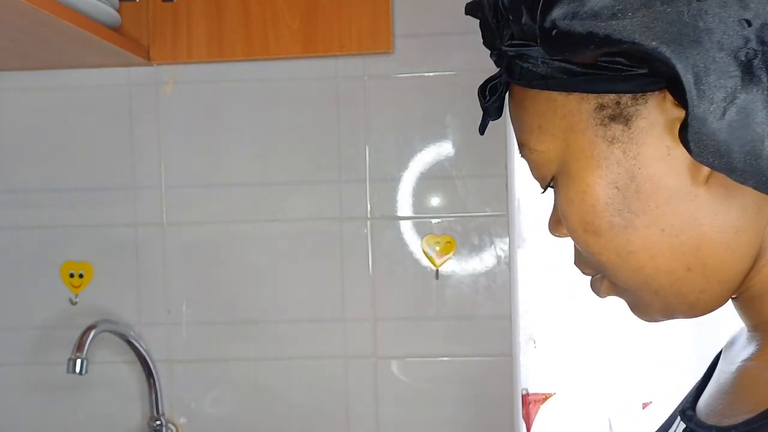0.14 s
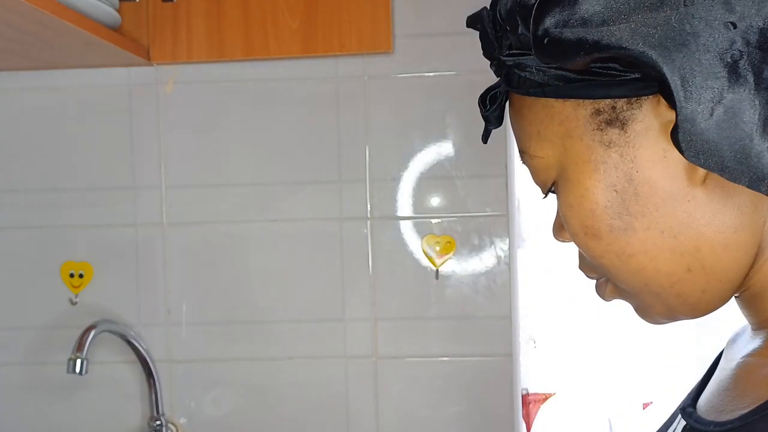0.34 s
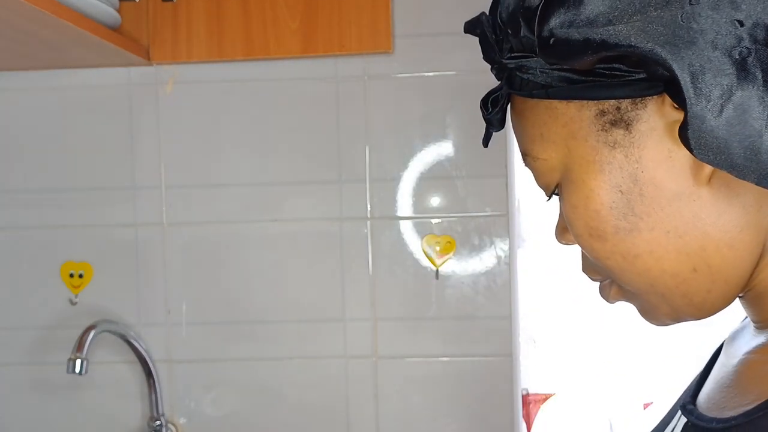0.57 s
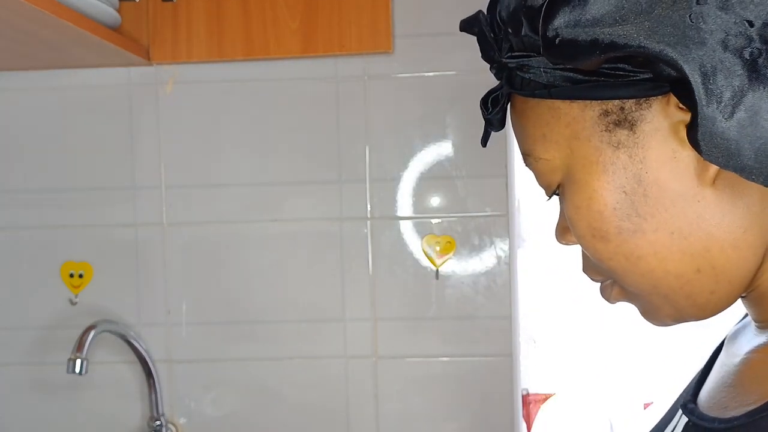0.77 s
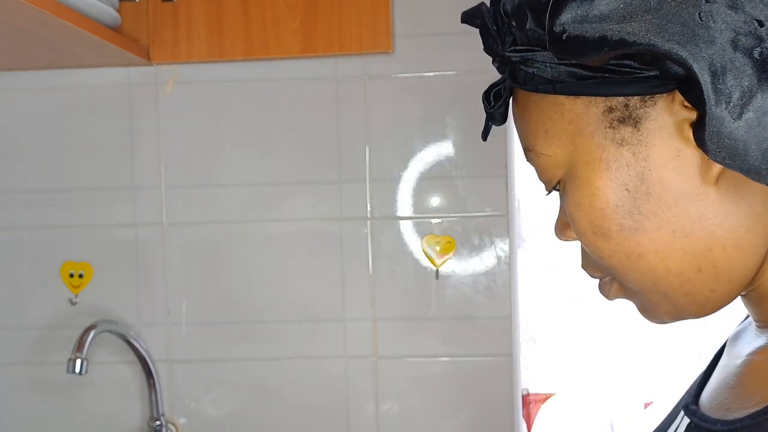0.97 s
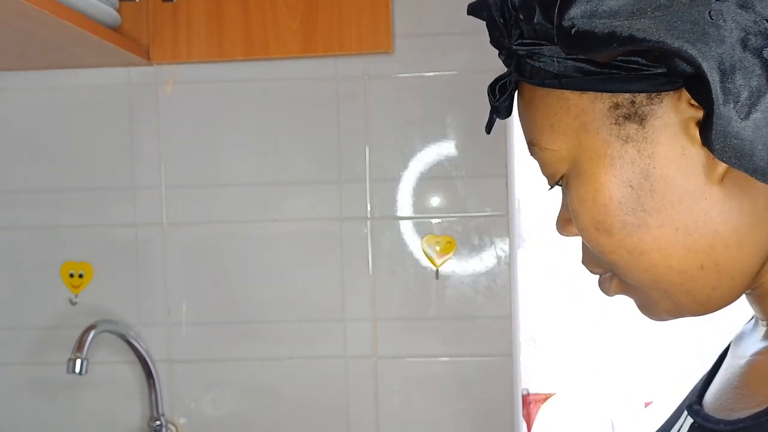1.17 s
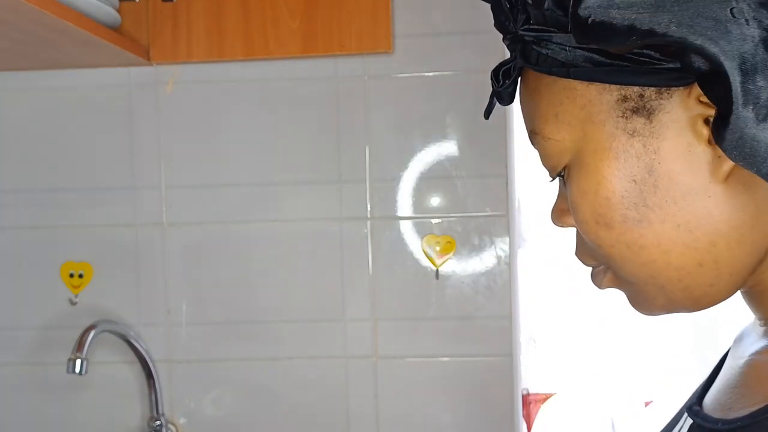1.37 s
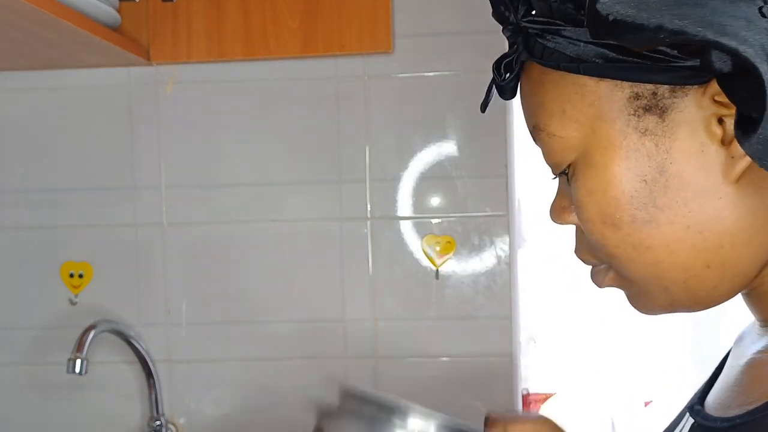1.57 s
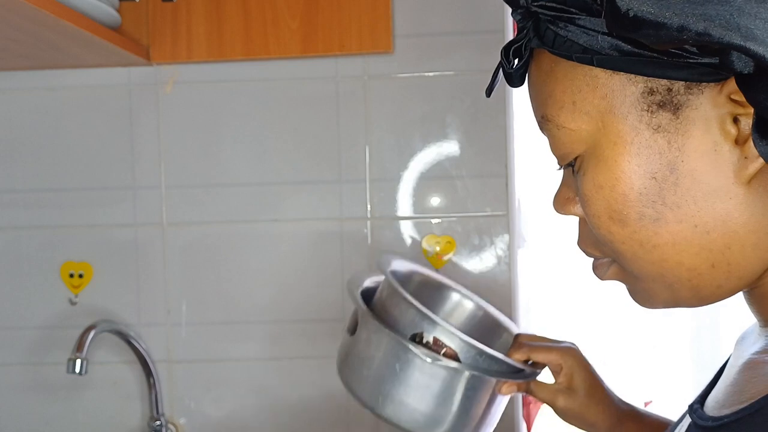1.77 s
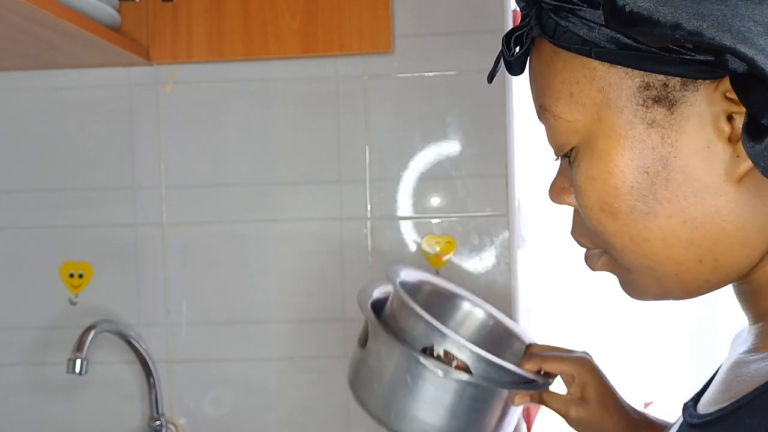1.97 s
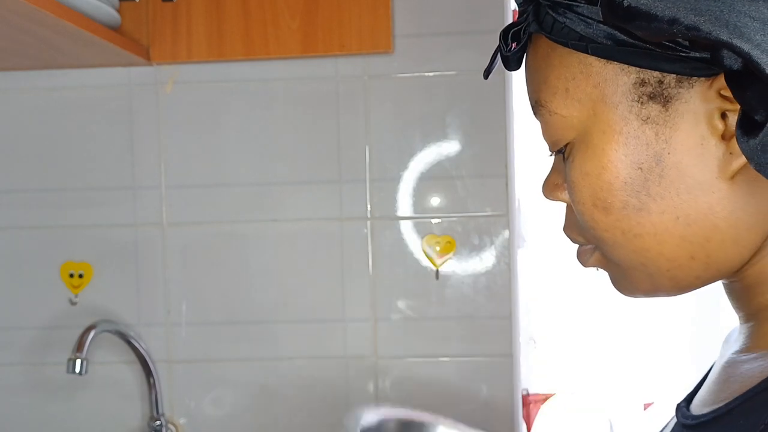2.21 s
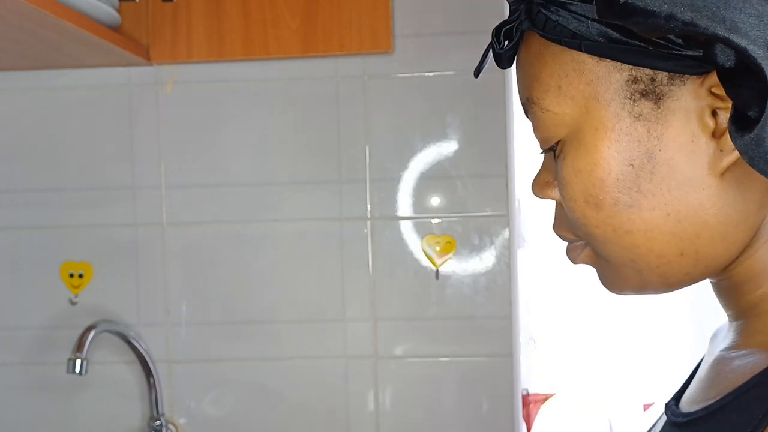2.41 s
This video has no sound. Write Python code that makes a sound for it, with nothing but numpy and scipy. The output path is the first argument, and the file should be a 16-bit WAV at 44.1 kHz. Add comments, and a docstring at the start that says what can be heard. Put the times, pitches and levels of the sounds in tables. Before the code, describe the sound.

Steel pots clatter as they are set down and nested on a sink top. A quick run of clanks gives way to lighter knocks, then two more clanks, the last ringing briefly, close by in a small tiled kitchen.

```python
"""Pots stacked on a steel sink

Steel pots and a pan are set down and nested on a sink top in a small tiled kitchen. Each impact drives the low
modes of the hollow bowl, the cabinet below and the room, then chatters on in small contacts. A pot, a pan, a
lid and a faint dish ring at their own natural frequencies, while the dense upper modes of the steel merge into
broad crashes. The room adds a short reverberation and a low, steady noise."""
import sys
import numpy as np
from scipy import signal
from scipy.fft import rfft, irfft
from scipy.io import wavfile
from scipy.ndimage import uniform_filter1d

SR = 44100
rng = np.random.default_rng(int(sys.argv[2]) if len(sys.argv) > 2 else 0)


def bounce(signal):
    """Save signal as a 16-bit WAV file at the path given by the first command-line argument."""
    frames = np.transpose(np.atleast_2d(signal))
    limited = np.clip(frames, -1, 1)
    pcm = np.round(limited * 32767).astype(np.int16)
    wavfile.write(sys.argv[1], SR, pcm)


N = 108045

# Knocks on the sink. Each row: start in seconds, relative bowl level in dB, centre in Hz,
# bowl T60 in seconds, chatter time constant in seconds, cabinet level in dB.
SINK_KNOCKS = [(0.204, 0.5, 433, 0.073, 0.0036, -44), (0.224, -5.5, 382, 0.17, 0.0053, -47),
               (0.249, -14, 388, 0.078, 0.012, -38), (0.285, -5.5, 363, 0.11, 0.014, -42),
               (0.337, -19, 342, 0.23, 0.0087, -40), (0.415, 6, 374, 0.14, 0.014, -36),
               (0.437, 0.5, 428, 0.062, 0.005, -37.5), (0.459, -2, 500, 0.09, 0.008, -41),
               (0.477, -6, 406, 0.076, 0.008, -42.5), (0.534, -21, 390, 0.21, 0.008, -57),
               (0.585, -7, 404, 0.24, 0.0027, -50), (0.62, 7.5, 495, 0.076, 0.018, -47),
               (0.636, -14.5, 412, 0.11, 0.018, -38), (0.677, -28, 415, 0.089, 0.0063, -50.5),
               (0.719, -21.5, 515, 0.076, 0.004, -57), (0.878, -43, 369, 0.28, 0.008, -65),
               (0.939, -34, 503, 0.26, 0.008, -58.5), (0.988, -28, 371, 0.4, 0.0093, -49),
               (1.08, -4.5, 474, 0.28, 0.0045, -41), (1.103, -23.5, 463, 0.26, 0.0045, -42),
               (1.138, -30, 455, 0.11, 0.0064, -48), (1.199, -31, 466, 0.12, 0.011, -58.5),
               (1.251, -29, 374, 0.15, 0.0071, -59.5), (1.296, -38, 371, 0.22, 0.0091, -56),
               (1.448, -34.5, 371, 0.17, 0.008, -56), (1.62, -48, 511, 0.42, 0.008, -68.5),
               (1.713, -7, 506, 0.13, 0.013, -30), (1.747, -14.5, 406, 0.22, 0.01, -35),
               (2, -40, 398, 0.14, 0.01, -58), (2.043, -5.5, 366, 0.093, 0.01, -40),
               (2.088, -12, 345, 0.3, 0.011, -50), (2.119, -9, 530, 0.052, 0.0094, -39.5),
               (2.338, -13.5, 304, 0.097, 0.019, -35), (2.367, -8.5, 283, 0.088, 0.0062, -47),
               (2.405, -9.5, 291, 0.087, 0.0053, -40)]
# Modes of the bowl. Each row: frequency in Hz, relative level in dB.
BOWL_MODES = [(250, -6.5), (282, -6.5), (320, -1.5), (345, -2.5), (375, 3), (405, 3), (430, -3), (460, 3.5),
              (503, -1), (532, -5), (580, -11.5)]
# Modes of the cabinet, with a long room mode near 128 Hz. Each row: frequency in Hz, relative level in dB, T60
# in seconds.
CABINET_MODES = [(40.2, -16.5, 0.34), (63.5, -11, 0.25), (127.74, 1.5, 0.43), (157.8, 0, .3),
                 (204, -6.5, .3), (248.3, -2.5, .45)]

# Natural frequencies of each vessel in Hz.
POT_HZ = [514, 1066, 1276, 1502, 1834, 1918, 2149, 2424, 2458, 2859, 3270, 3490, 3569, 4072, 4460, 4855,
          5650, 6580, 6840, 7720, 9190, 9910, 11200]
PAN_HZ = [958, 1265, 1556, 2130, 2277, 2530, 2702, 2813, 3133, 3553, 4151, 4856, 5873]
LID_HZ = [877, 1200, 1310, 1620, 1954, 2300, 2457, 3295, 3558, 4064, 4382, 4665, 5140, 5620]
DISH_HZ = [467, 540, 1351, 1451, 1666, 1866, 2320, 3500]
# The modes at those frequencies. Each row: relative level in dB, free T60 in seconds.
POT_MODES = [(-12.5, 1), (-14, 0.23), (-0.5, 0.71), (-20.5, 0.42), (0.5, 0.3), (0.5, 0.35), (-7.5, 0.6),
             (-9, 1), (-4.5, 1), (-6.5, 0.34), (-21.5, 1), (-14, 0.47), (-21, 0.54), (-15, 0.49),
             (-24.5, 0.9), (-30, 0.47), (-23.5, 0.44), (-23.5, 0.15), (-37, 0.18), (-22.5, 0.11),
             (-27, 0.13), (-20, 0.13), (-38, 0.22)]
PAN_MODES = [(-11.5, 0.33), (1.5, .12), (-13.5, 0.77), (-5.5, 0.15), (-1.5, 0.29), (-7.5, .2), (-1, 0.21),
             (-8.5, 0.63), (-8.5, .1), (-21, .25), (-22, .3), (-21, 0.36), (-25.5, 0.36)]
LID_MODES = [(-1, 0.28), (5, .2), (-0.5, 0.16), (-1, 0.13), (0, 0.21), (1, 0.43), (-0.5, 0.21), (-20, 0.2),
             (-11, .21), (-11, 0.21), (-15, .3), (-6, 0.36), (-10, 0.28), (-10, 0.23)]
DISH_MODES = [(-53.5, .15), (-55, .15), (-52, .4), (-54.5, .2), (-51, .2), (-51, .25), (-57, 0.31),
              (-72, 0.22)]
# Blows on each vessel. Each row: start in seconds, level in dB, chatter time constant in seconds, tilt
# above 1300 Hz in dB per octave, factor on the free T60, delay of the grip in seconds, grip loss in dB.
POT_BLOWS = [(1.292, -44, .003, -48.5, 1.2, 0.041, 1.5), (2.044, -12.5, 0.018, 0.5, 1.22, 0.1, 15),
             (2.2, -27.5, 0.0042, 1.5, 0.52, 0.1, -2)]
PAN_BLOWS = [(0.202, -11.5, 0.013, 1.5, 1.26, 0.066, 6), (0.285, -29.5, .01, -3.5, 1.4, 0.034, 3)]
LID_BLOWS = [(.99, -54, 0.018, -20, .9, 0.055, 1.5), (1.08, -51.5, .01, 6, 1.1, 0.052, 1.2),
             (1.293, -65, 0.012, 3, .7, .04, 3), (1.715, -20.5, 0.0088, -4.5, 0.49, 0.061, 1.9)]
DISH_BLOWS = [(0.00077, 0.019, .01, 0, 0.59, 1, 0)]

# Metal crashes. Each row: start in seconds, level in dB, tilt in dB per octave, attack in seconds,
# hold in seconds, T60 in seconds, lead of the left channel in milliseconds.
CRASHES = [(.001, -51, 0, 0.00033, 0.01, .3, 0.1), (0.199, -15.5, 1.5, 0.0046, 0.045, .3, 0.07),
           (0.286, -21, -1, 0.0033, 0.019, .25, 0.047), (0.413, -17.5, 2.5, .002, 0.03, .3, -0.074),
           (0.434, -13.5, -1, 0.0062, 0.017, .25, -0.11), (0.584, -30, 2.5, 0.0025, 0.06, .3, 0.019),
           (0.617, -16.5, 0, 0.0023, 0.02, 0.13, 0.1), (0.638, -33.5, -1.5, 0.031, 0.05, .3, .05),
           (0.921, -52, -4, 0.012, 0.023, .3, 0.11), (0.983, -38.5, -5, .005, 0.037, .3, 0.13),
           (1.078, -32, 2.5, 0.0025, 0.018, .3, 0.054), (1.288, -46, -2.5, .004, 0.018, .25, 0.16),
           (1.459, -65, -4.5, 0.0049, .02, 0.25, 0.12), (1.62, -70.5, 2, .02, 0.083, .2, 0.042),
           (1.714, -11.5, 6.5, 0.0029, 0.0023, 0.091, 0.025), (1.716, -16, 0, 0.0024, 0.032, 0.37, 0.1),
           (2.042, -22, -0.5, .002, 0.078, 0.24, 0.032), (2.199, -37, -1.5, 0.012, 0.021, 0.73, -0.26),
           (2.318, -43, 0.5, .03, .02, .3, -0.17), (2.371, -30, -3, 0.0034, 0.011, 0.19, -0.22)]
# Base spectrum of a crash. Each row: frequency in Hz, relative spectral density in dB.
CRASH_SPECTRUM = [(35, -61), (60, -38.5), (295, -34), (409, -25), (517, -17), (639, -8), (929, -5.5),
                  (3070, -13.5), (4790, -13.5), (11400, -17.5), (16200, -30.5)]
# Broad resonances of the stacked steel. Each row: centre in Hz, width in Hz, gain in dB.
STEEL_RESONANCES = [(966, 120, 4), (1279, 68, 5), (1507, 32, 5.5), (1910, 92, 4.5), (2202, 60, 5.5),
                    (2465, 150, 6), (3218, 67, -4), (3450, 500, 0.5), (4100, 160, 5.5), (4650, 73, 5.5),
                    (5260, 130, 0), (7370, 240, -1), (7540, 200, 2.5), (9400, 900, -1)]
# Stereo balance of every noise. Each row: frequency in Hz, left minus right in dB.
NOISE_BALANCE = [(60, 4.5), (110, 4), (200, -5.5), (380, 1.5), (700, -4), (1290, -2.5), (2380, -2.5),
                 (4400, -1.5), (8120, -4), (15000, 6)]
# Spectrum of the background. Each row: frequency in Hz, relative spectral density in dB.
BACKGROUND_SPECTRUM = [(25, -4.5), (87, 2.5), (250, -9.5), (960, -23.5), (1400, -13), (4250, -36),
                       (16000, -40)]

TWIN_SPLIT_HZ, TWIN_DB, TWIN_DB_PER_OCT = 8, -10.5, 4  # a mode's twin at 1 kHz; wider and stronger above
FIRST_CONTACT_GAIN, GRIP_FADE_S = 2.5, 0.078
KNOCK_REACH_OCT, KNOCK_FAR_DB, KNOCK_SCATTER_DB = 0.17, -15.5, 2.5
BOWL_RADIATES_HZ = 230
RIPPLE_WIDTH_HZ, RIPPLE_DB = 30, 3  # fine unevenness of the dense upper modes
COHERENT_BELOW_HZ, TREBLE_COHERENCE = 710, 0.64
ROOM_T60_S, ROOM_DB, ROOM_DELAY_S = 0.4, -5, 0.0018


def undb(db):
    """Amplitude is exponential in level: tenfold for every 20 dB."""
    return 10 ** (np.asarray(db) / 20)


def curve(hz, table):
    """Interpolation of a (Hz, value) table on a logarithmic frequency axis."""
    table = np.array(table, float)
    return np.interp(np.log(hz + 1), np.log(table[:, 0]), table[:, 1])


def add(out, sound, at_s):
    """Superposition: a sound sums into the mix from its start time."""
    start = int(at_s * SR)
    n = min(sound.shape[-1], N - start)
    out[:, start:start + n] += sound[..., :n]


def struck_modes(hz, db, t60, chatter_s, rise_s, left_lag_s=0, pan_db=0, grip_s=1, grip_db=0, size=30000):
    """Convolution: damped, beating mode pairs answer a chattering contact force; a hand may grip later."""
    t = np.arange(size) / SR
    force = rng.standard_normal(4096) * np.exp(-t[:4096] / chatter_s)
    force *= rng.random(4096) < .05  # sparse small contacts
    force[0] += FIRST_CONTACT_GAIN * np.linalg.norm(force)
    side = np.array([[1.], [-1.]])
    twins = rng.standard_normal((len(hz), 2))
    response = np.zeros((2, size))
    for f, level_db, decay_s, (spread, phase) in zip(hz, db, t60, twins):
        n = min(int(decay_s * SR * 1.2), size)
        twin_gain = undb(min(TWIN_DB + TWIN_DB_PER_OCT * np.log2(f / 1000), -1))
        beat_hz = TWIN_SPLIT_HZ * f / 1000 * (1 + 0.14 * spread)
        beat = 1 + twin_gain * np.exp(2j * np.pi * (beat_hz * t[:n] + phase))
        tone = beat * np.exp((2j * np.pi * f - np.log(1000) / decay_s) * t[:n]) * undb(level_db)
        placement = np.exp(-1j * np.pi * f * left_lag_s * side) * undb(side * pan_db / 2)
        response[:, :n] += np.imag(tone * placement)
    rise = np.sin(np.pi / 2 * np.minimum(t / rise_s, 1)) ** 2
    grip = undb(-grip_db * np.clip((t - grip_s) / GRIP_FADE_S, 0, 1))
    return signal.fftconvolve(response * rise * grip, force[None] / np.linalg.norm(force), axes=1)


def sink():
    """Resonance: a knock excites the bowl's modes near its centre frequency, the cabinet below and a low room
    mode."""
    bowl_hz, bowl_db = np.array(BOWL_MODES, float).T
    low_hz, low_db, low_t60 = np.array(CABINET_MODES, float).T
    bowl, cabinet = np.zeros((2, 2, N))
    for start_s, level_db, centre_hz, t60, chatter_s, cabinet_db in SINK_KNOCKS:
        near_db = np.maximum(-6 * (np.log2(bowl_hz / centre_hz) / KNOCK_REACH_OCT) ** 2, KNOCK_FAR_DB)
        scatter_db = KNOCK_SCATTER_DB * rng.standard_normal(len(bowl_hz))
        mix_db = bowl_db + near_db + scatter_db + level_db - 7.5
        boom = struck_modes(bowl_hz, mix_db, np.full_like(bowl_hz, t60), chatter_s,
                            rise_s=0.0036, left_lag_s=.0001, pan_db=-2.4, size=12000)
        thud = struck_modes(low_hz, low_db + cabinet_db, low_t60, chatter_s, rise_s=.012, size=16000)
        add(bowl, boom, start_s)
        add(cabinet, thud, start_s)
    radiation = signal.butter(4, BOWL_RADIATES_HZ, "high", fs=SR, output="sos")
    return signal.sosfilt(radiation, bowl) + cabinet


def vessel(hz, modes, blows, pan_db, left_lag_s=-0.00013):
    """Free vibration: after each blow a pot, pan, lid or dish rings at its natural frequencies."""
    out, hz = np.zeros((2, N)), np.array(hz, float)
    mode_db, free_t60 = np.array(modes, float).T
    for start_s, level_db, chatter_s, tilt_db, t60_factor, grip_s, grip_db in blows:
        mix_db = mode_db + level_db + tilt_db * np.maximum(np.log2(hz / 1300), 0)
        clang = struck_modes(hz, mix_db, free_t60 * t60_factor, chatter_s, rise_s=0.00027,
                             left_lag_s=left_lag_s, pan_db=pan_db, grip_s=grip_s, grip_db=grip_db)
        add(out, clang, start_s)
    return out


def stereo_noise(size, spectrum, colour_db=0., left_lead_s=0.):
    """Partial coherence: coloured noise of unit rms whose channels agree in the bass, less in treble."""
    hz = np.fft.rfftfreq(size, 1 / SR)
    gain = undb(curve(hz, spectrum) + colour_db)
    coherence = TREBLE_COHERENCE + (1 - TREBLE_COHERENCE) / (1 + (hz / COHERENT_BELOW_HZ) ** 2)
    mid, side = rfft(rng.standard_normal((2, size))) * gain * np.sqrt([1 + coherence, 1 - coherence])
    pan = undb(curve(hz, NOISE_BALANCE) / 2) * np.exp(1j * np.pi * hz * left_lead_s)
    out = irfft(np.array([(mid + side) * pan, (mid - side) / pan]), size)
    return out / np.sqrt(np.mean(out ** 2))


def crashes(size=2 ** 14):
    """Modal overlap: the steel's dense upper modes and the tiles blur into bursts of uneven noise."""
    out, t, hz = np.zeros((2, N)), np.arange(size) / SR, np.fft.rfftfreq(size, 1 / SR)
    ripple = uniform_filter1d(rng.standard_normal(len(hz)), int(RIPPLE_WIDTH_HZ * size / SR))
    resonance_db = sum(db / (1 + (2 * (hz - f) / width) ** 2) for f, width, db in STEEL_RESONANCES)
    steel_db = resonance_db + RIPPLE_DB * ripple / ripple.std()
    for start_s, level_db, tilt_db, attack_s, hold_s, t60, lead_ms in CRASHES:
        attack = np.minimum(t / attack_s, 1)
        release = undb(-60 * np.maximum(t - attack_s - hold_s, 0) / t60)
        colour_db = steel_db + tilt_db * np.log2(hz / 2000 + .15)
        noise = stereo_noise(size, CRASH_SPECTRUM, colour_db, lead_ms / 1000)
        add(out, noise * attack * release * undb(level_db), start_s)
    return out


def reverberation(sound, size=2 ** 14):
    """Diffuse reflection: a small tiled room answers with a dense, exponentially decaying tail."""
    t = np.arange(size) / SR
    decay = undb(-60 * t / ROOM_T60_S) * (t > ROOM_DELAY_S)
    tail = stereo_noise(size, [(50, -4.5), (16000, -9.5)]) * decay
    tail /= np.sqrt(np.mean(np.sum(tail ** 2, axis=1)))  # unit energy
    return signal.fftconvolve(sound.mean(axis=0)[None], tail, axes=1)[:, :N] * undb(ROOM_DB)


def background(level_db=-72):
    """Stationary noise: a faint rumble lies under the impacts."""
    return undb(level_db) * stereo_noise(N + 1, BACKGROUND_SPECTRUM)[:, :N]


def scene():
    """Superposition: the ringing bodies, their reverberation, the crashes and the background add."""
    ringing = (sink()
               + vessel(POT_HZ, POT_MODES, POT_BLOWS, pan_db=-8.5, left_lag_s=0.00014)
               + vessel(PAN_HZ, PAN_MODES, PAN_BLOWS, pan_db=-2.5)
               + vessel(LID_HZ, LID_MODES, LID_BLOWS, pan_db=0)
               + vessel(DISH_HZ, DISH_MODES, DISH_BLOWS, pan_db=-2.5))
    return ringing + reverberation(ringing) + crashes() + background()


def record(dry, cutoff_hz=16150):
    """Saturation and band limiting: a nearby phone flattens the loudest peaks and cuts the top treble."""
    lowpass = signal.ellip(8, .2, 60, cutoff_hz, fs=SR, output="sos")
    band_limited = signal.sosfilt(lowpass, np.clip(dry, -1, 1))
    return np.clip(band_limited, -1, 1)


dry = scene()
out = record(dry)
bounce(out)
```